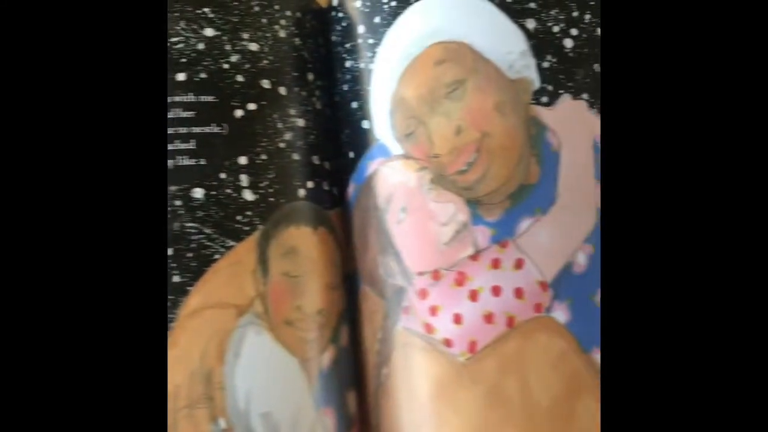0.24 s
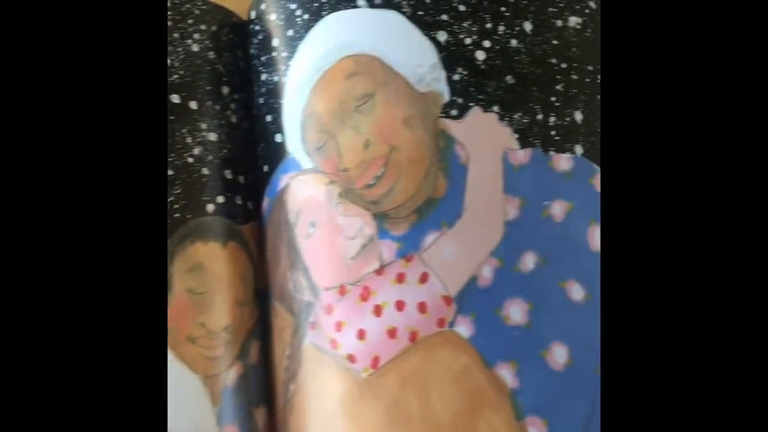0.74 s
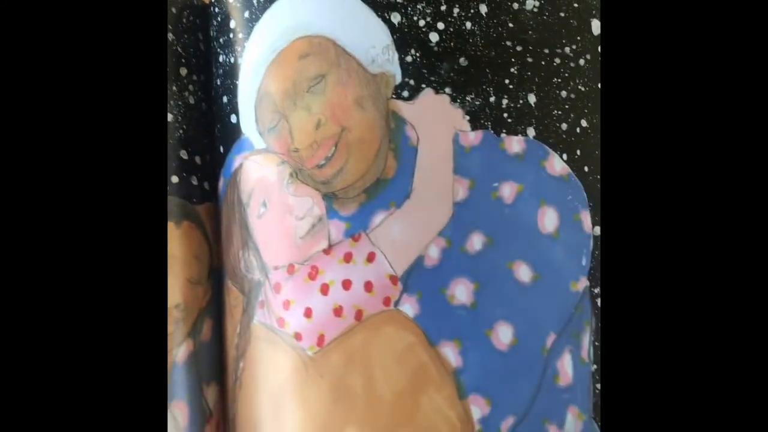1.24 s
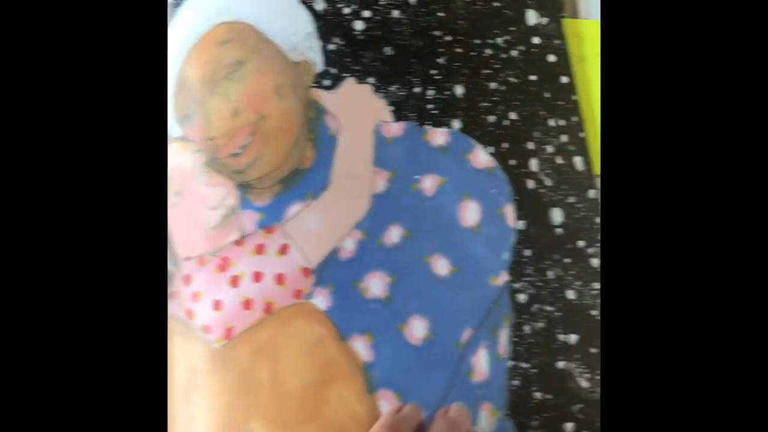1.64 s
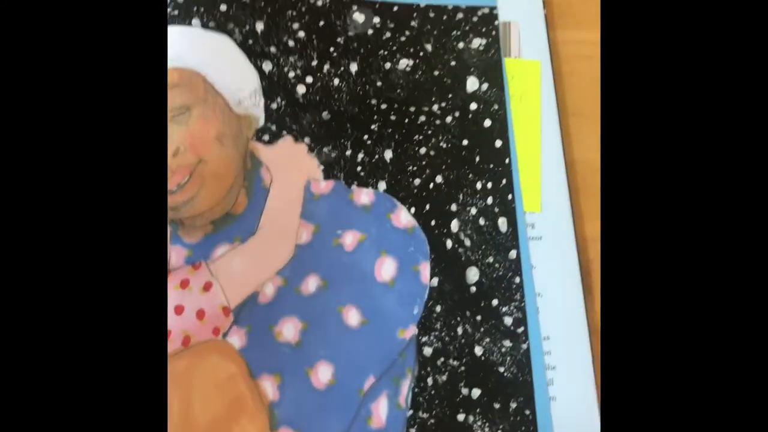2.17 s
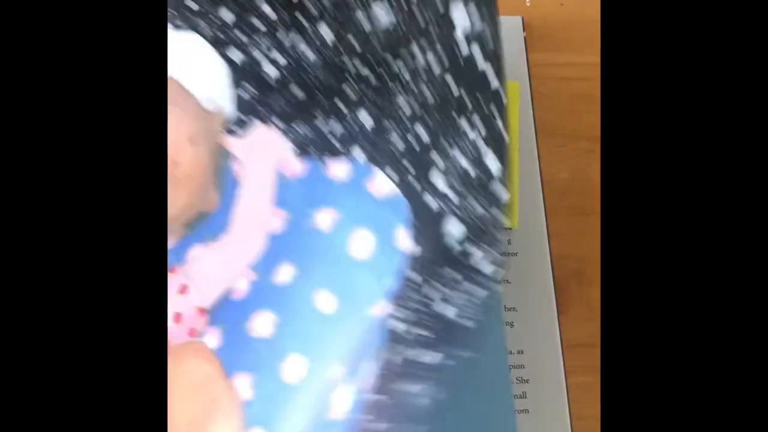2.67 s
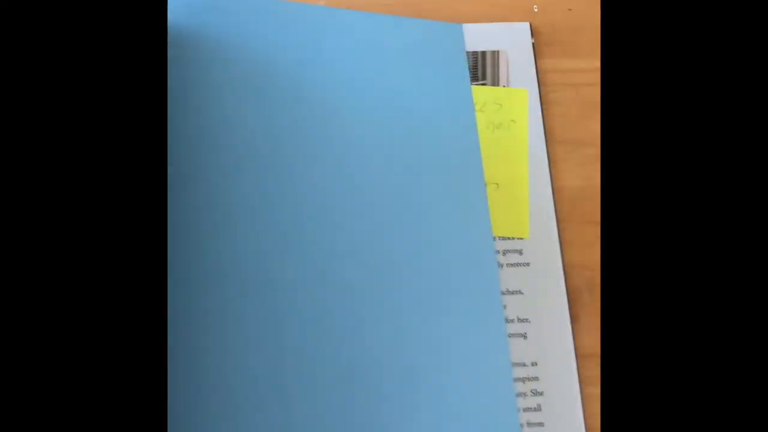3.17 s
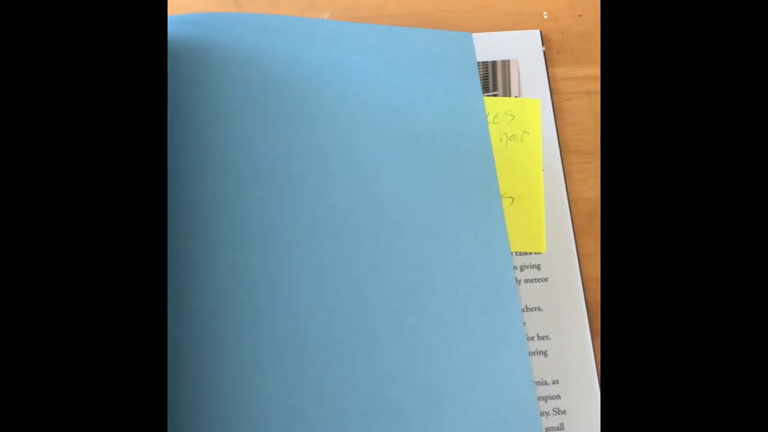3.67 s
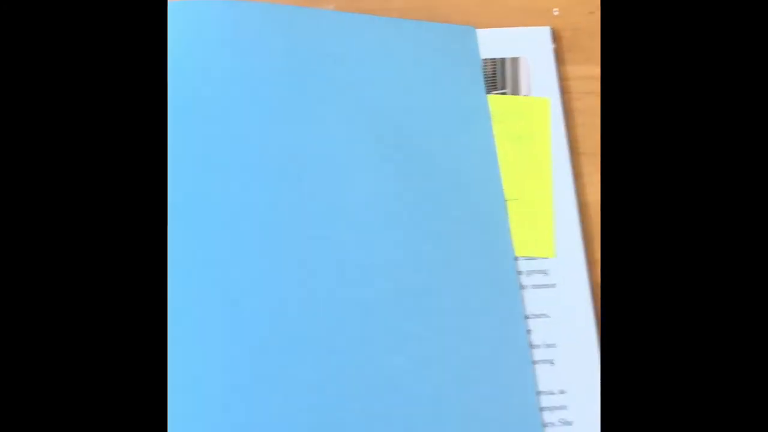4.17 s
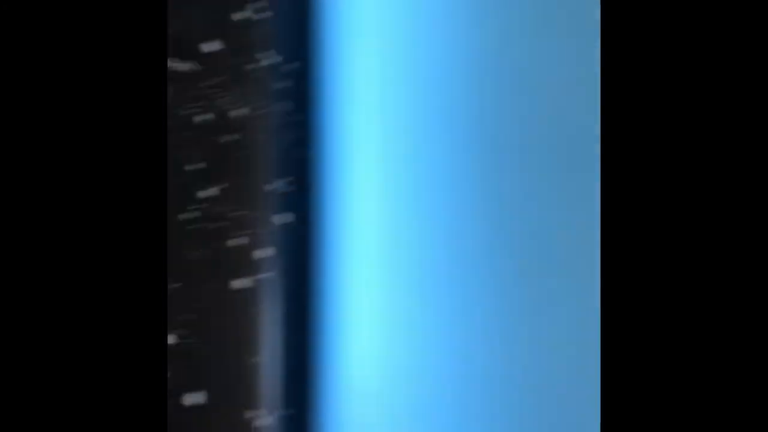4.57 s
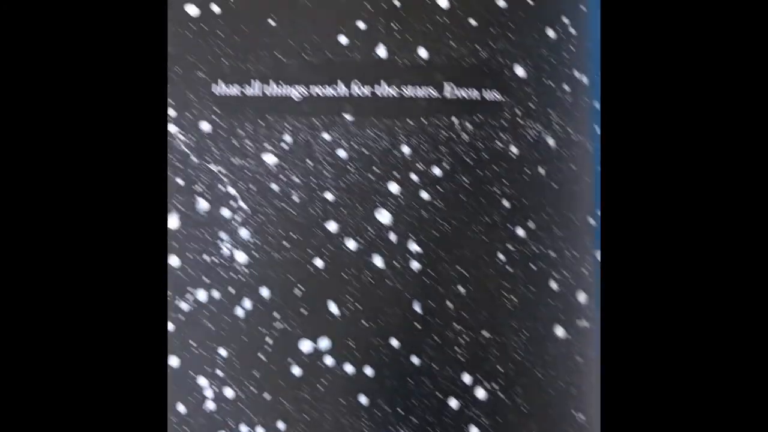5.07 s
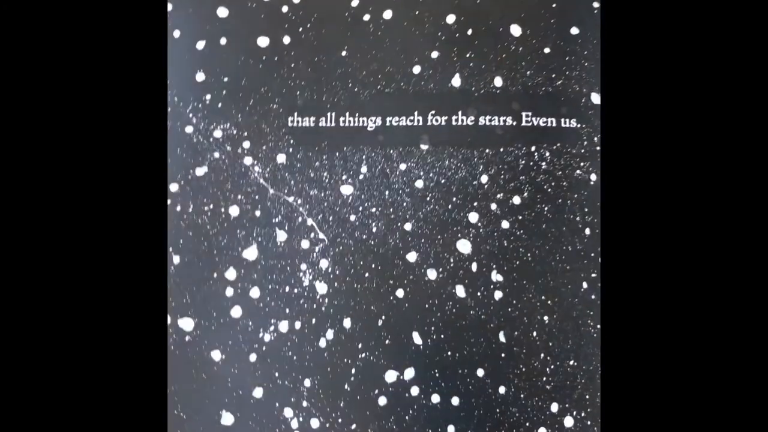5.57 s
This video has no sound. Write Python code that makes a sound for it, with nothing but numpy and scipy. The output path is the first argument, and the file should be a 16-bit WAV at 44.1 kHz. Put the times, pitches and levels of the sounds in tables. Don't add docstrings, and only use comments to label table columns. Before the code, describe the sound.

Close dry paper rubbing and rustling, a burst of hard page snaps midway, then small ticks and faint finger scrapes fading into room tone.

```python
import sys
import numpy as np
from scipy import signal
from scipy.fft import rfft, irfft, next_fast_len
from scipy.io import wavfile
from scipy.ndimage import uniform_filter1d, map_coordinates

SR = 44100
rng = np.random.default_rng(int(sys.argv[2]) if len(sys.argv) > 2 else 0)


def volts_from_db(level):
    exponent = np.asarray(level, float) / 20
    return 10 ** exponent


def persist_wave(psi):
    counts = np.round(np.clip(psi, -1, 1) * 32767).astype(np.int16)
    wavfile.write(sys.argv[1], SR, np.atleast_2d(counts).T)


N = 256578


def unit(x):
    return x / np.sqrt(np.mean(np.abs(x) ** 2) + 1e-20)


def along(points, hz):
    f, v = np.transpose(points)
    return np.interp(np.log(hz + 1), np.log(f + 1), v)


def peak(f, hz, width_hz):
    return 1j * f * width_hz / (hz * hz - f * f + 1j * f * width_hz)


def filtered(x, response):
    m = next_fast_len(len(x) + 4096)
    return irfft(rfft(x, m) * response(np.fft.rfftfreq(m, 1 / SR)), m)[:len(x)]


def wobble(rate):
    return map_coordinates(rng.standard_normal(int(N * rate / SR) + 4), [np.arange(N) * rate / SR])


def patchy(depth_db, shape=lambda hz, t: 1):
    hz, t, z = signal.stft(rng.standard_normal(N), SR, nperseg=512)
    field = uniform_filter1d(rng.standard_normal(z.shape), size=6, axis=0)
    field = uniform_filter1d(field, size=8, axis=1)
    z = z * volts_from_db(depth_db * unit(field)) * shape(hz[:, None], t)
    return signal.istft(z, SR, nperseg=512)[1][:N]


def add(track, s, x):
    part = track[round(s * SR):][:len(x)]
    part += x[:len(part)]


# pitch_hz, level_db (per Hz)
ROOM_TONE = [(25, -28), (53, -2.5), (124, 0.3), (300, -2), (1180, -17), (11900, -26), (15700, -28.5),
             (16200, -61)]
# time_s, level_db, pitch_hz
FAR_SQUEAK = [
    (0, -72, 2380),
    (0.1, -79, 2300),
    (0.16, -80, 2200),
    (.3, -82, 2120),
    (.4, -100, 2050),
]
ROOM_DB = -63.5


def room():
    hush = unit(filtered(patchy(0.92), lambda f: volts_from_db(along(ROOM_TONE, f) - along(MICROPHONE, f))))
    s, *cols = np.transpose(FAR_SQUEAK)
    squeak_db, squeak_hz = [np.interp(np.arange(N) / SR, s, c) for c in cols]
    phase = 2 * np.pi * np.cumsum(squeak_hz) / SR
    squeak = (0.74 + wobble(400)) * np.sin(phase)
    return volts_from_db(ROOM_DB + 0.38 * wobble(3.0)) * hush + volts_from_db(squeak_db) * squeak


# start_s, level_db (peak), pitch_hz (air pocket), length_s
FINGER_PATS = [(1.814, -36, 685, 0.015), (1.948, -31, 630, 0.011), (1.954, -32, 865, 0.014),
               (1.977, -43, 740, 0.012), (2.02, -41, 654, 0.0066), (2.309, -32, 670, 0.0089),
               (2.353, -33.5, 700, 0.028), (2.371, -31, 736, 0.0059), (2.573, -39, 870, 0.0071),
               (2.694, -37.5, 520, 0.011), (2.884, -52, 157, 0.0099), (3.076, -44, 277, 0.012),
               (3.337, -38.5, 248, 0.012), (3.428, -29, 382, 0.012), (3.743, -14, 540, 0.009),
               (3.989, -41, 151, 0.012), (4.103, -41, 404, 0.012), (4.335, -44, 253, 0.024),
               (4.593, -50, 146, 0.017), (4.773, -39.5, 570, 0.017), (5.055, -46.5, 457, 0.017),
               (5.076, -48, 472, 0.021), (5.114, -48.5, 650, 0.0087), (5.682, -39.5, 449, 0.012)]


def pats():
    out, t = np.zeros(N), np.arange(4096) / SR
    for s, db, hz, length in FINGER_PATS:
        push = rng.standard_normal(len(t)) * (t / length) ** 0.58 * np.exp(-3.1 * t / length)
        puff = filtered(push, lambda f: peak(f, hz, 0.53 * hz) ** 2 + 0.19 * peak(f, 1.93 * hz, hz) ** 2)
        add(out, s, volts_from_db(db - 3.0) * puff / np.max(np.abs(puff)))
    return out


# start_s, level_db (rms), length_s, pitch_hz (centre), edge_db
SHORT_SCRAPES = [
    (1.041, -62, 0.011, 12500, .1),
    (1.08, -72, 0.063, 8900, 5),
    (1.947, -48.5, 0.033, 1100, -35),
    (3.597, -38.5, .024, 2880, -42),
    (3.877, -40, 0.048, 4670, -27),
    (3.973, -45, 0.015, 3950, -23),
    (4.745, -42.5, 0.01, 2960, -11),
    (5.675, -59.5, .006, 1450, -21.5),
]
# start_s, level_db (rms)
FINGER_STUTTER = [(4.526, -49), (4.553, -46.5), (4.588, -46), (4.627, -45.5), (4.667, -48.5), (4.697, -48),
                  (4.773, -51.5), (4.816, -47.5), (4.858, -48.5), (4.901, -50.5), (4.973, -50),
                  (5.128, -60), (5.149, -57.5), (5.187, -59.5), (5.229, -57), (5.299, -60.5)]
SLIP_S, SLIP_HZ, SLIP_SAG_HZ_PER_S, SLIP_EDGE_DB = .015, 5900, 2600, -20.5


def scrapes():
    out, t = np.zeros(N), np.arange(4096) / SR
    slips = []
    for s, db in FINGER_STUTTER:
        sagged_hz = SLIP_HZ - SLIP_SAG_HZ_PER_S * (s - FINGER_STUTTER[0][0])
        slips.append((s, db, SLIP_S, sagged_hz, SLIP_EDGE_DB))
    for s, db, length, hz, edge_db in SHORT_SCRAPES + slips:
        swell = np.clip(np.minimum(t, length - t) / 0.0071, 0, 1)
        broad = min(1.2, length / .026)

        def colour(f):
            gap = np.abs(peak(f, hz, .35 * hz)) ** 2
            sheet = broad * np.abs(peak(f, 2300, 3500))
            return gap + sheet + volts_from_db(edge_db) * np.abs(peak(f, 12100, 8000)) ** 2
        add(out, s, volts_from_db(db) * swell * unit(filtered(rng.standard_normal(len(t)), colour)))
    return out


# start_s, level_db (peak), pitch_hz (centre), edge_db
EDGE_TICKS = [(0.9993, -49, 3000, -19), (2.166, -41, 5000, -12), (2.355, -28.5, 4500, -15),
              (2.409, -36.5, 1790, -20), (2.471, -33, 1590, -23), (2.494, -35, 1390, -26),
              (3.119, -17, 3500, -14.5), (3.475, -42, 1900, -26), (4.1706, -27, 3900, -13),
              (4.4717, -23, 4000, -5.5), (4.7, -38.5, 1700, -18), (4.7495, -23.5, 5030, 1),
              (4.775, -33, 1510, -20), (4.815, -30, 1970, -24), (4.858, -33, 1770, -25),
              (4.905, -36.5, 1590, -18), (4.976, -35, 1580, -20), (5.0166, -24, 5000, -0.5),
              (5.3066, -37, 3470, -21), (5.682, -43, 1240, -17), (5.6816, -52, 4790, -12)]
TICK_WIDTH, RATTLE_DB = 1, -13


def ticks():
    out, m = np.zeros(N), 2048
    f, t = np.fft.rfftfreq(m, 1 / SR), np.arange(m) / SR
    chirp = np.exp(-2j * np.pi * (.7 * np.log(f + 300) + f * .001))
    fade = volts_from_db(-60 * np.abs(t - .0016) / 0.012) * (t > .001)
    for s, db, hz, edge_db in EDGE_TICKS:
        colour = np.abs(peak(f, hz, TICK_WIDTH * hz)) ** 2
        colour = colour + volts_from_db(edge_db) * np.abs(peak(f, 11500, 9600)) ** 2
        crack = irfft(colour * chirp, m)
        rattle = fade * unit(irfft(colour * rfft(rng.standard_normal(m)), m))
        add(out, s, volts_from_db(db) * (crack / np.max(np.abs(crack)) + volts_from_db(RATTLE_DB) * rattle))
    return out


# start_s, level_db (peak), body_db, boom_db, rustle_db (after it)
BUCKLES = [
    (3.4298, -24, -9.5, -13.5, -5),
    (3.49, -44.5, -4.5, -8, -15),
    (3.5164, -15.5, -14, -17.5, -13.5),
    (3.5553, -15.5, -9.5, -9, -14),
    (3.6378, -18.5, -12, -22, -34),
    (3.742, -8.5, -18, -24, -16),
    (3.793, -8, -13.5, -18.5, -18),
    (3.8521, -3.5, -15, -29.5, -20.5),
    (3.8712, -10, -14, -22.5, -15),
    (3.9689, -19.5, -5.5, -11, -14),
]
# start_s, level_db (peak), body_db, boom_db, rustle_db
SECOND_BUCKLES = [
    (3.7441, -10, -8, -18.5, -26.5),
    (3.7671, -13.5, -12, -21, -17),
    (3.7696, -17.5, -13, -27.5, -16),
    (3.6015, -29.5, -2, -10.5, -18),
]
SNAP_EDGE_DB = -28.5
BOOM_HZ, BOOM_GLIDE_HZ, BOOM_GLIDE_S = 60, 85, .011


def snaps():
    out, m = np.zeros(N), 4096
    f, t = np.fft.rfftfreq(m, 1 / SR), np.arange(m) / SR
    bend = np.exp(-2j * np.pi * (.45 * np.log(f + 150) - 1500 / (f + 300) + f * .001))
    edge = 1 + 0.38 * np.exp(-2j * np.pi * f * 0.00092 - f / 3000)
    glide = BOOM_HZ * t - BOOM_GLIDE_HZ * BOOM_GLIDE_S * np.expm1(-t / BOOM_GLIDE_S)
    gate = np.exp(-t / 0.021) * np.clip((.012 - t) / 0.0067, 0, 1) * np.clip(t / 0.0022 - .6, 0, 1)
    for s, db, body_db, boom_db, rustle_db in [*BUCKLES, *SECOND_BUCKLES]:
        size_db = along([(90, body_db + 8.0), (300, body_db + 15.5), (550, body_db + 20),
                         (1000, body_db + 15.5), (2000, 0), (4500, -2.5),
                         (8000, SNAP_EDGE_DB + 13.0), (16000, SNAP_EDGE_DB - 17.5)], f)
        chirp = volts_from_db(db + 14.5) * irfft(volts_from_db(size_db) * bend * edge, m)
        thud = np.sin(2 * np.pi * rng.uniform(.85, 1.2) * glide)
        boom = volts_from_db(db + boom_db + 3 - 60 * t / 0.085) * thud * (1 - np.exp(-t / 0.007))
        rustle = filtered(rng.standard_normal(m), lambda hz: peak(hz, 2800, 3500)
                          + volts_from_db(SNAP_EDGE_DB + 11.5) * peak(hz, 19000, 8300))
        add(out, s, chirp + boom + volts_from_db(db + rustle_db) * gate * rustle)
    return out


SWELL_DB, ROUNDNESS = 20.5, 1.8


def swells(rows):
    s, db, rise, fall, offset_db = np.transpose(rows)[:, :, None]
    late = np.arange(0, N / SR + .002, .001) - s
    each = volts_from_db(db - SWELL_DB * np.where(late < 0, -late / rise, late / fall) ** ROUNDNESS)
    total = [np.linalg.norm(each * g, axis=0) for g in (1, volts_from_db(offset_db))]
    return [np.interp(np.arange(N) / SR, late[0] + s[0], g) for g in total]


# fullest_s, level_db (rub),
# swell_s, fade_s, dryness_db (fizz over rub)
SHEET_RUBS = [(1.80, -50.5, .07, .13, .6), (1.912, -44, 0.13, 0.039, -3), (2.095, -48, 0.16, 0.081, -8.5),
              (2.27, -48, 0.18, .06, -4), (2.313, -40, 0.037, .03, -3), (2.357, -47.5, 0.011, 0.015, -15),
              (2.395, -57.5, 0.059, 0.07, 7), (2.447, -51.5, 0.075, 0.11, -3),
              (2.535, -52.5, 0.056, .04, -3), (2.58, -46, 0.049, 0.11, 0.9), (2.70, -50, 0.079, 0.2, -2),
              (2.82, -46.5, 0.17, 0.076, -4.5), (2.895, -44.5, 0.049, 0.12, -0.4),
              (3.0, -48, 0.13, 0.19, 0), (3.13, -44.5, 0.16, 0.19, -5.5),
              (3.29, -45.5, 0.052, 0.14, -4.5), (3.40, -46.5, .1, 0.035, -4.5),
              (3.56, -51, 0.16, 0.21, -8.5),
    (3.89, -57, 0.28, 0.21, -14),
    (4.13, -61, 0.16, 0.23, -4.5),
    (4.25, -63, 0.14, 0.13, -7.5),
    (4.55, -60.5, 0.11, 0.23, -5.5),
    (4.69, -62, 0.22, 0.22, -10),
    (4.93, -65, 0.27, .4, -7.5),
    (5.1, -72, 0.19, 0.44, -6),
]
# heaviest_s, level_db (rumble), swell_s, fade_s, pocket_db (over rumble)
HAND_LEANS = [(1.81, -64, 0.08, .1, 12.5), (1.89, -77.5, .08, 0.055, 23.5),
              (1.95, -51.5, 0.032, 0.086, 2.5), (2.09, -54.5, 0.13, 0.091, 6),
              (2.313, -48, 0.026, 0.03, -1), (2.375, -52.5, 0.028, 0.028, 4.5),
              (2.5, -58, 0.039, 0.048, 1.5), (2.58, -57.5, .05, 0.079, 5.5), (2.69, -64.5, .04, 0.21, 9.5),
              (2.891, -46.5, 0.051, 0.034, -24), (3.09, -52.5, .17, 0.057, -7.5),
              (3.34, -51, 0.12, 0.092, -5), (3.42, -46.5, .04, 0.081, -7.5), (3.55, -41, 0.13, 0.23, -11),
              (3.88, -38.5, 0.19, .16, -5.5), (4.13, -59, 0.11, 0.16, -2), (4.25, -66, 0.13, 0.1, 5),
              (4.5, -71, 0.069, .15, 8), (4.65, -63, .15, 0.14, 2.5), (4.778, -56, 0.13, 0.18, -9),
              (5.05, -65.5, 0.38, 0.27, -1.5), (5.35, -68, 0.23, 0.27, -5)]
# start_s, gap_hz (air gap), gap_db, span_hz (free span), span_db
SHEET_GRIPS = [(1.72, 2360, 0, 4600, 9), (2.15, 1870, 5, 5060, 14.5), (2.52, 1530, 9, 4300, 10.5),
               (2.65, 2320, 11, 4180, 14.5), (2.87, 3270, 10, 4400, 17), (2.96, 3190, 12, 3950, 19),
               (3.42, 1600, -4, 3100, 10), (4.03, 1190, 2.5, 5000, 9), (4.46, 1690, -3, 5700, 11),
               (4.76, 1650, 4, 4360, 10), (5.011, 1614, 11, 4480, 6.5)]
# pitch_hz, level_db (per Hz)
RUB_COLOUR = [(900, -6), (1400, 9.5), (3000, 4), (6500, -5.5), (8000, -7), (11000, -35)]
# pitch_hz, level_db (per Hz)
FIZZ_COLOUR = [(3240, -15), (5500, -6.5), (14500, -15.5), (16100, -7), (16300, -46), (16500, -61)]
# pitch_hz, level_db (per Hz)
RUMBLE_COLOUR = [(18, -34.5), (30, -5.5), (70, -2), (250, -0.1), (516, -8.5), (600, -11.5), (780, -56),
                 (1320, -120)]
# pitch_hz, width_hz, level_db
AIR_POCKET = [
    [(740, 220, 1.5), (1080, 420, -11.5)],
    [(521, 310, -3), (760, 440, -0.5), (1025, 460, 0)],
]
OPENS_S, RUB_IN_POCKET_DB = 2.45, -14
GAP_WIDTH, SPAN_WIDTH, OVERTONE, OVERTONE_DB = .22, 0.3, 1.6, -4.5
TOUCH_S, TOUCH_RISE_S = 1.748, .006


def gap_colour(hz, t):
    def ring(centre, width, db):
        return volts_from_db(db) * np.abs(peak(hz, centre, width * centre)) ** 2
    gains = []
    for _, gap_hz, gap_db, span_hz, span_db in SHEET_GRIPS:
        gap = ring(gap_hz, GAP_WIDTH, gap_db)
        span = ring(span_hz, SPAN_WIDTH, span_db)
        overtone = ring(OVERTONE * span_hz, SPAN_WIDTH, span_db + OVERTONE_DB)
        gains.append(unit(volts_from_db(along(RUB_COLOUR, hz)) * (1.5 + gap + span + overtone)))
    stage = np.searchsorted([row[0] for row in SHEET_GRIPS[1:]], t)
    return uniform_filter1d(np.hstack(gains)[:, stage], size=7, axis=1)


def pocket_air(modes):
    def colour(f):
        return sum(volts_from_db(db) * np.abs(peak(f, hz, width)) ** 2 for hz, width, db in modes)
    return unit(filtered(patchy(1.5), colour))


def sliding():
    time = np.arange(N) / SR
    rubbing, fizzing = swells(SHEET_RUBS)
    weight, puffing = swells(HAND_LEANS)
    touch = np.clip((time - TOUCH_S) / TOUCH_RISE_S, 0, 1)
    catch = volts_from_db(0.99 * wobble(60) + 1.12 * wobble(700))
    rub = unit(catch * patchy(1.7, gap_colour))
    fizz = unit(catch * filtered(patchy(3.0), lambda f: volts_from_db(along(FIZZ_COLOUR, f))))
    shut, wide = [pocket_air(modes) for modes in AIR_POCKET]
    pocket = unit(catch * volts_from_db(1.56 * wobble(35)) * np.where(time < OPENS_S, shut, wide))
    low = filtered(rng.standard_normal(N), lambda f: volts_from_db(along(RUMBLE_COLOUR, f)))
    rumble = unit(volts_from_db(4.3 * wobble(25.203)) * low)
    dip_db = sum(-7 * np.exp(-((time - s - .016) / 0.0042) ** 2) for s, db, *_ in BUCKLES if db > -30)
    pocket_gain = np.hypot(puffing, volts_from_db(RUB_IN_POCKET_DB) * rubbing)
    paper = rubbing * rub + fizzing * fizz + pocket_gain * pocket
    return touch * volts_from_db(dip_db) * paper + weight * rumble


def scene():
    paper = sliding() + snaps() + ticks() + scrapes() + pats()
    return np.tile(paper + room(), (2, 1))


def roll_off(x):
    return signal.sosfilt(signal.butter(12, 16820, fs=SR, output="sos"), x)


# pitch_hz, level_db
MICROPHONE = [(20, -27), (45, -5.5), (70, 1.5), (11000, -0.5), (15000, -5), (16300, -19.5), (16700, -49)]


def record(dry):
    heard = filtered(dry[0], lambda f: volts_from_db(along(MICROPHONE, f)))
    return roll_off(np.tile(heard, (2, 1)))


dry = scene()
out = record(dry)
persist_wave(out)
```